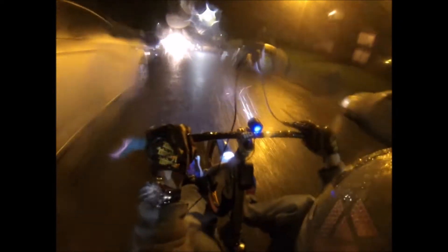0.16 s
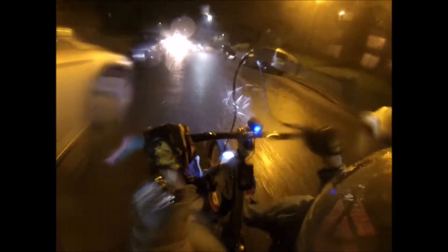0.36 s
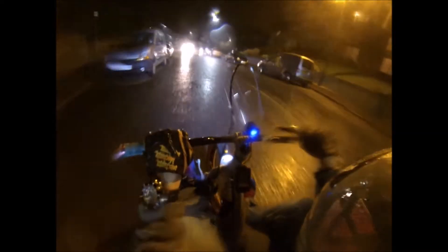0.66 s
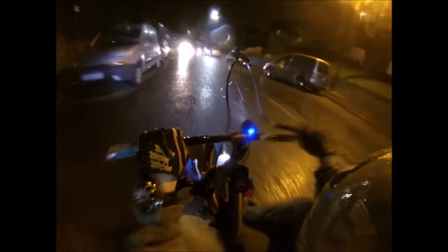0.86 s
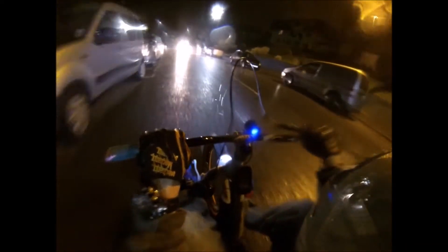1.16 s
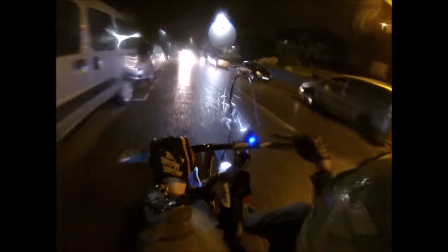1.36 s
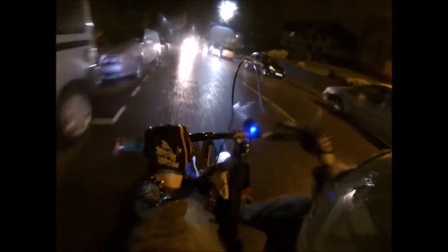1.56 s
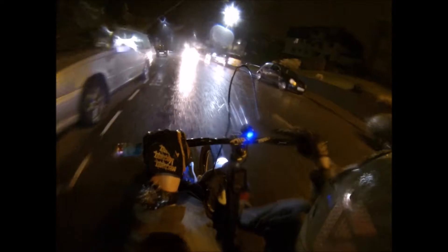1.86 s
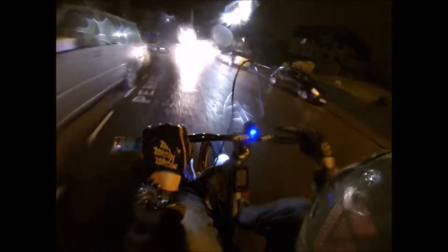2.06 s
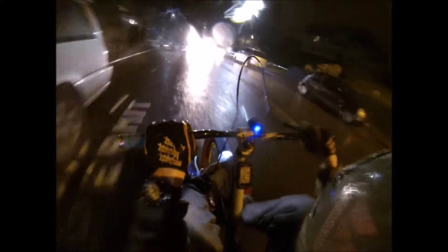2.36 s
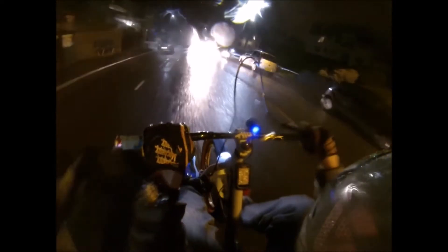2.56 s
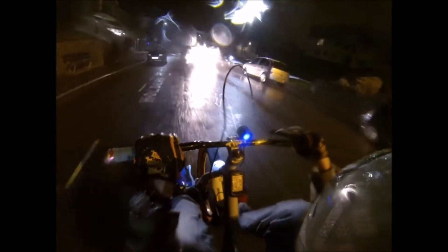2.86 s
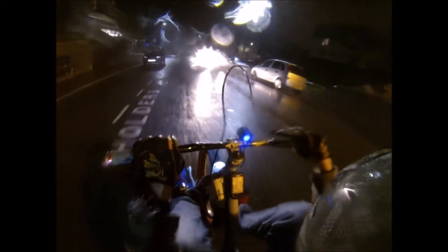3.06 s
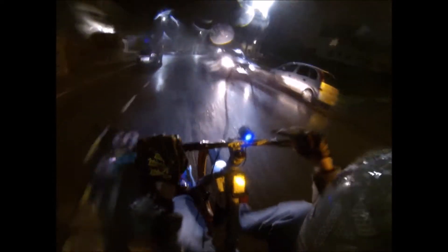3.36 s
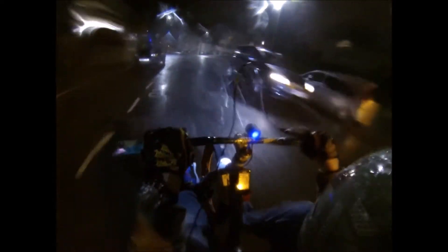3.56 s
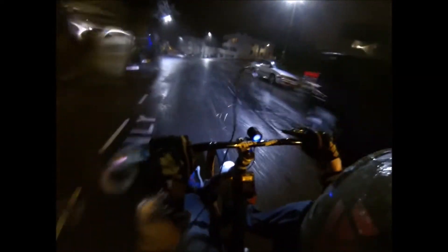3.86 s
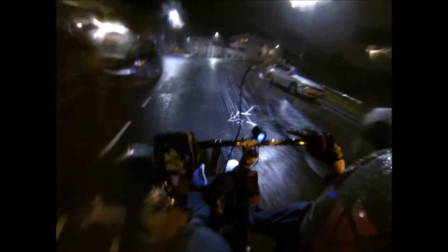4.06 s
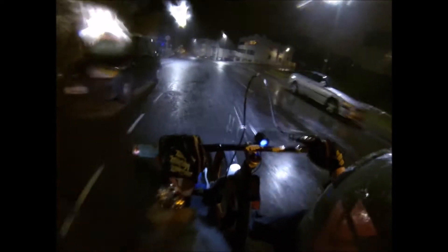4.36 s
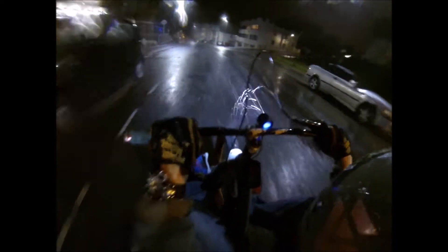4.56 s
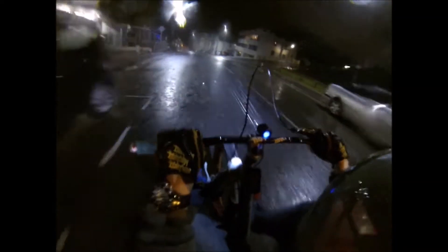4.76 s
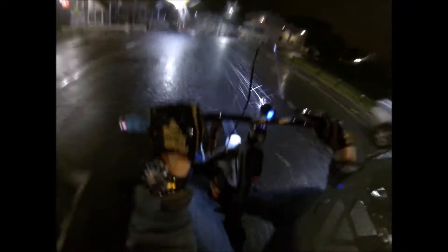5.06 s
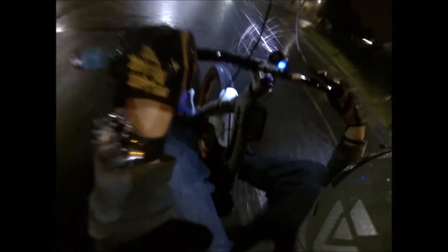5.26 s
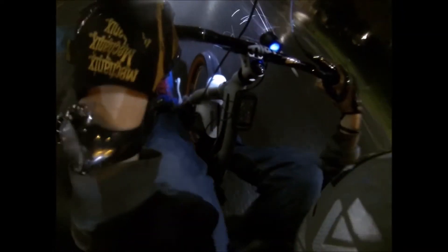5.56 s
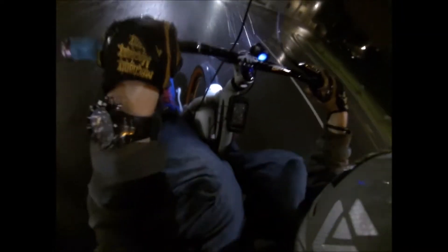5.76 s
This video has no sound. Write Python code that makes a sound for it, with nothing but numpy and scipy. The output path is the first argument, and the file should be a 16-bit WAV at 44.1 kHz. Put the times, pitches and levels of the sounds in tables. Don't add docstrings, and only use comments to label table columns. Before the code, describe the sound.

A tricycle speeds over wet, rough asphalt, heard inside a sealed camera case: low rumble, hard plastic knocks, rattles, and fine ticking spray.

```python
import sys
import numpy as np
from scipy import signal
from scipy.fft import rfft, irfft
from scipy.io import wavfile
from scipy.ndimage import uniform_filter1d

SR = 44100
rng = np.random.default_rng(int(sys.argv[2]) if len(sys.argv) > 2 else 0)


def inscribe(sig):
    pcm = np.round(np.clip(np.atleast_2d(sig).T, -1, 1) * 32767)
    wavfile.write(sys.argv[1], SR, pcm.astype(np.int16))


def gain_from_decibels(decibels):
    exponent = np.asarray(decibels, float) / 20
    return 10 ** exponent


N = 260190
T = np.arange(N) / SR

# f/Hz, level/dB per Hz
RUMBLE = [(3, -8.5), (10, 3.5), (18, -6), (27, 5), (38, -1), (50, -16), (90, -30), (140, -24.5), (300, -65)]
# t/s, lift/dB, length/s
WAVES = [
    (0, 10, 0.56),
    (1.15, 5.5, 0.32),
    (2.25, 6.5, 0.4),
    (2.85, 5.5, 0.27),
    (3.45, 4, 0.59),
    (4., 5, 0.14),
    (4.4, 11.5, 0.11),
    (4.75, 3.5, 0.39),
    (5.7, 3.5, 0.2),
]
# t/s, lift/dB
RIDGES = [(.2, 3), (.76, 3), (1.27, 4.5), (2.05, 3.5), (2.6, 6), (3., 15), (3.6, 3.5), (4., 9.5), (4.5, 10),
          (4.949, 5), (5.35, 6.5), (5.9, 8)]
# t/s, lift/dB
SEAMS = [
    (1.899, 4),
    (2.651, 3),
    (3.05, 2),
    (3.65, 4.5),
    (4.2, 8.5),
    (4.6, 4),
    (5.4, 8),
    (5.9, 2.5),
]


def shake():
    rumble = steadied(coloured(RUMBLE, 10, 52), share=0.51)
    fork = steadied(family(rng.standard_normal(N), [(67.0, 0, 0.18)], order=2), share=0.31)
    frame = steadied(family(rng.standard_normal(N), [(169.4, 0, 0.1)], order=2), share=0.13)
    waves = lifts(WAVES)
    ridges = lifts((s, db, 0.27) for s, db in RIDGES)
    seams = lifts((s, db, 0.26) for s, db in SEAMS)
    both = gain_from_decibels(-26.34 + waves) * rumble + gain_from_decibels(-33.5 + ridges) * fork
    both = both + gain_from_decibels(-38.5 + 0.82 * waves + seams) * frame
    return road(0, per_rough=0.03) * both


# f/Hz, level/dB, t60/s
HOLLOW = [(1320.5, -5.5, 0.065), (1503, 6.5, 0.037), (1595, 5, 0.034)]
# f/Hz, level/dB, t60/s
BRACKET = [(526.4, -5, 0.15), (714, 3.5, 0.067), (770, 4, 0.01)]


def hollow():
    buzz = rng.standard_normal(N) * wobble(hz=70, db=3.5)
    damped = [(hz, db, 0.14 * t60) for hz, db, t60 in HOLLOW]
    note = steadied(family(buzz, damped, order=2), share=0.44)
    hum = evened(family(rng.standard_normal(N), BRACKET))
    return road(-27, per_rough=0.96) * (note + gain_from_decibels(-23) * hum)


# t/s, shell level/dB, then clack and tip levels/dB over the shell
KNOCKS = [(0.0811, -3.5, -14.5, -22), (.118, -6.5, -2, -12), (0.1385, -5, -9.5, -15), (.16, -7.5, -26, -25),
          (0.2243, -8, -6, -14), (0.3857, -1, -8.5, -11.5), (0.4278, -2.5, -11, -16),
          (0.6678, -0.5, -17, -18), (1.149, -9, -7.5, -21), (1.3737, 2.5, -12, -16), (1.5229, 0, -9, -19.5),
          (1.69, -11.5, -37, -23), (1.9809, -10, -17, -22), (2.1963, -9.5, -5.5, -9), (2.413, -9, -20, -30),
          (2.6538, -1.5, -13, -27), (2.664, -5, -3, -18), (2.755, -3, -17, -11), (3.0847, -1.5, -9, -21),
          (3.1461, -8, -3, -8), (3.8065, -7.5, -12, -15.5), (4.0834, -4, -3.5, -13), (4.359, -4.5, -5, -19),
          (4.4006, -8.5, -22, -25), (4.4276, -9, 2.5, -12), (4.5535, -9.5, -2.5, -0.5),
          (5.109, -5.5, -7.5, -22), (5.2116, -0.5, -14, -18.5), (5.216, -2.5, -4, -13),
          (5.6926, -5.5, -3.5, -10)]
KNOCK_HZ = [2750, 2780, 2800, 2670, 2680, 2840, 2450, 2620, 2780, 2650, 2820, 2810, 2710, 2720, 2600, 2810,
            2855, 2850, 2746, 2950, 2670, 2820, 2490, 2810, 2580, 2880, 2650, 2740, 2790, 2670]
# t/s, shell level/dB, clack level/dB over the shell
RATTLES = [(0.143, -15, -7), (.257, -13, -4), (0.3347, -16, -3), (0.3423, -11, -5.5), (0.367, -7.5, -2.5),
           (0.435, -9, -13), (0.818, -13.5, -19), (2.072, -17, -2.5), (2.2286, -19, -4),
           (2.5012, -16.5, -8), (2.6228, -13, -0.5), (2.74, -14.5, 2.5), (2.866, -13, -3.5),
           (3.007, -12.5, -4.5), (3.69, -14.5, -14), (3.7587, -15, -2), (3.77, -11, -6),
           (3.839, -10, -11.5), (3.841, -19, -6), (3.874, -11, -10), (3.9327, -12, -10), (4.059, -15, -8),
           (4.2007, -13.5, -7), (4.261, -10.5, -4.5), (4.776, -16, -3), (4.779, -12.5, -15),
           (4.8023, -14, -20), (4.905, -13.5, -30), (5.1494, -16, -4.5), (5.288, -11, -11)]
# f/Hz, level/dB, t60/s
SHELL = [(2064, -13, .025), (2362, -4, .016), (2646, 7, .019), (2857, 3, .011), (3510, -12, .018)]
# f/Hz, level/dB, t60/s
CLACK = [(4310, 1.3, 0.018), (4480, 0.83, 0.014), (4916, 11.7, 0.0099), (5410, 8.3, 0.0082),
         (6110, 3.5, 0.011)]
# f/Hz, level/dB, t60/s
TIP = [(7990, 0, .00145), (11010, 1.6, .0019), (12600, -11.8, .0007)]


def knocks():
    out = np.zeros(N)
    core_hz = SHELL[2][0]
    blows = KNOCKS + [(s, db, clack_db, clack_db - 9.5) for s, db, clack_db in RATTLES]
    pitches = KNOCK_HZ + [1.03 * core_hz] * len(RATTLES)
    for (s, db, clack_db, tip_db), hz in zip(blows, pitches):
        shell = [(f * hz / core_hz, mode_db, t60) for f, mode_db, t60 in SHELL]
        add(out, s, gain_from_decibels(db + 1.5) * strike(shell, .0011, 1.5, blow=.6, detune=.008, snap_db=1))
        add(out, s, gain_from_decibels(db + clack_db + 2.5) * strike(CLACK, .001, 2.5, blow=.7))
        add(out, s, gain_from_decibels(db + tip_db + 2.5) * strike(TIP, .0009, 2, blow=.5, sign=-1))
        stir_air(out, s, db)
    return out


# t/s, hollow note level/dB
THUDS = [(0.7515, -9), (1.2803, -8.5), (1.372, -18), (1.522, -19), (1.5381, -9), (1.6536, -16),
         (1.6817, -7.5), (1.98, -4.5), (2.1827, -13), (2.4149, -3.5), (2.4495, -8), (2.605, -8),
         (3.0852, -6.5), (3.549, -8), (3.7378, -10), (3.77, -5), (4.0523, -8), (4.169, -4.5), (4.2, -9),
         (4.428, -12), (4.5532, -8), (4.6648, -11), (5.2098, -7), (5.2146, -9), (5.54, -10.5), (5.5875, -9),
         (5.612, -11), (5.621, -7), (5.6435, -10), (5.658, -9)]
# t/s, hollow note level/dB, bracket level/dB
JOLTS = [(0.1595, -7, -40), (0.366, -7.5, -35), (0.6659, -8.5, -40), (.9515, -10.5, -35),
         (1.029, -13.5, -48), (1.2897, -12, -30), (1.3, -6.5, -36), (1.7295, -2.5, -31), (2.6445, -10, -45),
         (2.665, -1, -34), (2.9621, -5, -31), (3.0289, -33, -25.5), (3.3348, -16, -45), (3.6549, -15, -36),
         (3.674, -8.5, -28.5), (3.758, -47, -34), (4.0226, -7, -39), (4.0694, -25, -43), (4.2592, -5, -45),
         (4.3603, -6.5, -35), (4.5302, -21, -39), (5.421, -11.5, -34.5)]


def jolts():
    out = np.zeros(N)
    stiff = [(hz, db, .55 * t60) for hz, db, t60 in HOLLOW]
    for s, db, bracket_db in JOLTS + [(s, db, db - 79) for s, db in THUDS]:
        add(out, s - .0004, gain_from_decibels(db - .5) * strike(stiff, .0005, 2.5, blow=1.5, detune=.02, snap_db=0))
        add(out, s - .0013, gain_from_decibels(bracket_db + 4.5) * strike(BRACKET, .00031, .24, detune=0))
    return out


# t/s, clack level/dB, tip level/dB over the clack
STONES = [(0.358, -19, -9), (.391, -7, -5), (.422, -19, -22), (0.469, -13, -7), (0.4847, -12.5, -21),
          (0.6275, -19, -5), (1.2868, -10, -11), (1.326, -20, -9), (1.968, -20.5, -7), (2.218, -18, -15),
          (2.243, -23.5, 5), (2.358, -18, -2), (2.55, -18, -8), (2.562, -22, -14), (2.73, -18.5, -15),
          (3.676, -18, -3), (4.0232, -16, -1.5), (4.2207, -21, -10), (4.416, -36, 5), (4.424, -20, -21),
          (4.53, -12.5, 0), (4.598, -21.5, 5.5), (4.7682, -20, -5), (4.788, -18.5, 1), (4.9215, -22, 6),
          (5.2296, -27, 4), (5.251, -15.5, -8), (5.6137, -13, -2.5), (5.6208, -19.5, -26),
          (5.6572, -10.5, -7), (0.897, -32, -2), (1.682, -31, -7), (2.149, -32, -2), (3.4866, -35, -2),
          (3.559, -37, -8), (5.643, -41, -10)]
# t/s, clack level/dB
MUD = [(.0097, -26), (.1736, -23), (.1811, -26), (.508, -27), (.6059, -20.5), (1.361, -22), (1.7314, -23),
       (1.9278, -24), (1.9334, -24), (2.2364, -31), (2.278, -24), (2.3177, -23), (2.3547, -33),
       (2.5915, -23.5), (2.962, -26), (3.0588, -28), (3.1752, -24), (3.2616, -38), (3.945, -21),
       (4.02, -22), (4.1343, -28), (4.193, -22), (4.7979, -27), (4.8112, -17), (5.14, -23)]
# t/s, clack level/dB
GRIT = [(.2938, -27), (.3078, -21), (.6425, -23), (.777, -20.5), (.9487, -28), (.9523, -19), (1.1712, -27),
        (1.4741, -24), (1.5724, -28), (1.6033, -19.5), (1.7657, -21), (1.772, -25), (1.916, -23.5),
        (2.3161, -29), (2.331, -23), (2.3455, -18), (2.7464, -26), (3.0237, -23), (3.159, -23),
        (3.3348, -25), (3.608, -19.5), (3.654, -22), (3.7357, -22), (4.1693, -24), (4.6649, -19.5),
        (4.9579, -23), (5.0802, -27.5), (5.092, -26), (5.5379, -23), (5.8324, -21.5)]
# t/s, clack level/dB
SAND = [(.1556, -25), (.2006, -23), (.4961, -36), (.698, -28), (.7276, -25.5), (.8236, -28), (1.1916, -31),
        (1.433, -26), (1.9128, -26), (2.0866, -23.5), (2.3227, -35), (2.372, -26), (2.4593, -26.5),
        (2.547, -22), (2.556, -25), (3.0964, -18), (3.2935, -26), (3.631, -21.5), (3.6644, -24),
        (4.0347, -32), (4.125, -27), (4.7199, -29), (4.7594, -24), (5.015, -33), (5.1805, -28),
        (1.447, -29), (1.466, -23), (1.583, -24.5), (2.848, -35), (2.966, -36)]
# t/s, clack level/dB
DROPS = [(.088, -37), (.205, -41), (1.0993, -33), (1.2581, -37), (1.2984, -30), (1.6115, -32),
         (1.7586, -31), (1.8686, -42), (2.2725, -27.5), (2.9336, -32), (2.9452, -38), (3.3212, -32),
         (3.5488, -35), (4.7082, -45), (4.7486, -33), (5.0201, -41), (.061, -52), (.321, -32), (.454, -33),
         (.572, -35), (.737, -30), (1.181, -32), (1.211, -45), (1.546, -40), (2.339, -32), (2.386, -52),
         (2.678, -35), (2.699, -36), (2.709, -39), (2.789, -41)]


def touches():
    out = np.zeros(N)
    hits = list(STONES)
    for rows, tip_db in ((MUD, -8), (GRIT, -5), (SAND, -2.5), (DROPS, 3.5)):
        hits += [(s, db, tip_db) for s, db in rows]
    for s, db, tip_db in hits:
        add(out, s, gain_from_decibels(db + 2.5) * strike(SHELL, .0006, 4.5, blow=.9))
        add(out, s, gain_from_decibels(db + 2.5) * strike(CLACK, .0008, 3, blow=.8))
        add(out, s, gain_from_decibels(db + tip_db + 2) * strike(TIP, .0006, 2, blow=.5, sign=-1))
    for s, db, _ in STONES:
        stir_air(out, s, db)
    return out


# t/s, clack level/dB, tip level/dB over the clack
CHIPS = [(0.326, -23, -9.0), (0.466, -24, -11), (0.506, -33, -3), (0.7493, -31, -20.0), (0.809, -31, -12),
         (0.897, -42, -9), (0.9738, -29, -14), (1.539, -26, -17.5), (1.7516, -33.0, -26), (1.873, -33, -4),
         (1.9495, -32, -11.0), (1.981, -27, -23), (2.1327, -33, -11), (2.1824, -30, -15.5),
         (2.1856, -29, -14), (2.205, -25, -10), (2.5098, -38, -21.0), (2.9447, -22, -4),
         (3.1305, -29, -27.5), (3.2799, -30, -10.0), (3.454, -30, -14), (3.521, -32, -11),
         (3.6377, -33, -14.5), (3.822, -26, -8.5), (4.036, -20, -9), (4.416, -17, -9.5), (4.7078, -26, -11),
         (4.7122, -31, -10), (4.822, -31, -25.5), (4.997, -31, -12), (5.173, -30, -10), (5.23, -21, -6),
         (5.243, -31, -6.0), (5.4506, -31.5, -15.0), (5.4687, -32, -14), (5.5879, -31, -28.5)]
# t/s, shell level/dB
BUMPS = [(0.141, -14), (0.1556, -23.0), (0.1811, -24), (0.2406, -21), (0.3124, -19), (0.496, -22),
         (0.512, -15), (0.534, -19), (0.644, -14.5), (0.7769, -14), (1.0231, -26), (1.1008, -31),
         (1.538, -12), (1.5844, -20), (1.6824, -24), (1.7715, -16.5), (1.8109, -16.5), (1.994, -17),
         (2.0874, -32), (2.15, -27), (2.244, -17), (2.408, -38), (2.7747, -18), (2.9559, -19), (3.177, -19),
         (3.486, -26), (3.549, -25), (3.5564, -24), (3.6554, -22), (4.136, -22), (4.919, -24), (5.08, -19),
         (5.097, -19), (5.1994, -20), (5.5402, -17.5), (5.6428, -27)]
# t/s, tip level/dB
SPECKS = [(0.2746, -46), (0.3465, -45.0), (0.4008, -37), (0.4213, -43), (0.4798, -45), (0.515, -48.0),
          (0.5666, -46), (0.7109, -39), (0.8176, -31.5), (0.8716, -46), (1.1989, -42), (1.3021, -50.0),
          (1.3666, -49), (1.4424, -51.0), (1.5914, -46), (1.7338, -46), (1.8445, -42), (2.0397, -56),
          (2.4377, -47.5), (2.5142, -51), (2.6027, -48.5), (2.7594, -37), (2.9491, -39), (3.0125, -51.5),
          (3.0613, -50.5), (3.0902, -44), (3.3539, -42), (3.4596, -52), (3.5017, -44), (3.5878, -51),
          (4.0271, -43), (4.0665, -52), (4.174, -47.0), (4.1842, -41), (4.2072, -44), (4.2309, -47),
          (4.2553, -49.0), (4.422, -42), (4.5485, -43), (4.7785, -40), (4.8004, -40), (4.8547, -50),
          (4.9007, -50.0), (4.9046, -53), (4.9759, -51), (5.0112, -47.5), (5.0539, -51), (5.1134, -47),
          (5.1576, -44.0), (5.2978, -36), (5.3433, -46), (5.6736, -50.0), (5.8261, -48)]
# t/s, tip level/dB
FLECKS = [(0.0509, -42), (0.2068, -31), (0.2629, -45), (0.2907, -28.5), (0.2977, -39), (0.3418, -25),
          (0.3749, -29), (0.4476, -42), (0.5304, -44), (0.6211, -45.5), (0.6528, -46), (0.6785, -49.0),
          (0.7564, -38), (0.8346, -46), (1.3332, -41), (1.6997, -50.5), (1.8071, -48), (1.8393, -47),
          (2.1911, -40), (2.3538, -36.5), (2.4511, -38), (2.4691, -48.0), (2.6605, -48), (3.0323, -41.5),
          (3.1058, -51.0), (3.1398, -64), (3.1845, -51.0), (3.2617, -44), (3.3476, -45.5), (3.3926, -53),
          (3.5079, -48.0), (3.5237, -39), (3.5804, -39), (3.5851, -46), (3.5974, -52), (3.6133, -43),
          (3.706, -41.0), (3.838, -29), (3.8683, -45.0), (4.0707, -51), (4.1934, -26), (4.2441, -37),
          (4.3244, -45), (4.3524, -37), (4.6621, -41), (4.6894, -48.5), (4.8711, -44.5), (4.8832, -49.5),
          (4.9154, -39.0), (4.9296, -41), (5.0199, -36), (5.1856, -43.0), (5.3737, -41), (5.5529, -47)]


def ticks():
    out = np.zeros(N)
    fine = [(s, db + 11, -11) for s, db in SPECKS] + [(s, db - 3, 3) for s, db in FLECKS]
    for s, db, tip_db in CHIPS + fine:
        add(out, s, gain_from_decibels(db + 4) * strike(CLACK, .0001, 1.6, blow=.48))
        add(out, s, gain_from_decibels(db + tip_db + 8.5) * strike(TIP, .00055, 3.6, blow=.51, sign=-1.8))
    for s, db in BUMPS:
        add(out, s, gain_from_decibels(db + 3.5) * strike(SHELL, .00013, 10, blow=2.3))
    return out


def patter():
    spray_gusts = wobble(hz=70, db=5.5)
    grit = grains(per_s=350, spread_db=4.5)
    out = 0
    for modes, spray_db, grit_db in ((SHELL, -4, -12), (CLACK, -13, -16), (TIP, -25, -29)):
        spray = grains(per_s=1500, spread_db=4.5)
        out = out + gain_from_decibels(spray_db) * spray_gusts * evened(struck(spray, modes))
        out = out + gain_from_decibels(grit_db) * evened(struck(grit, modes))
    port = evened(family(rng.standard_normal(N), [(5050, 0, .0055)], order=2)) * spray_gusts ** .3
    return road(-40.5, per_rough=0.065, per_wet=0.93) * (out + gain_from_decibels(-9.5) * port)


# f/Hz, level/dB per Hz
WASH = [(53, -46), (90, -9), (118, -12), (171, -7), (241, -14.5), (875, -21.5), (1370, 1), (2030, -16),
        (2700, -16.5), (6500, -45.5), (8450, -44), (14300, -120)]


def wash():
    gain = road(-42.5, per_rough=0.17, per_wet=0.25)
    return gain * coloured(WASH, 221, 910) * wobble(hz=26, db=2)


def whine():
    return gain_from_decibels(-73.5) * evened(ring(rng.standard_normal(N), 12900, .04))


# t/s, roughness level/dB, wetness level/dB
ROAD = [(0, -6, -4), (.25, 6.5, 1.5), (.45, 3.5, 3.5), (.85, -2.5, -10), (1.1, -2.5, -10), (1.5, 2, -5.5),
        (1.8, -2.5, -3), (2.4, 0, -3), (2.9, 6.5, 1), (3.1, 3, 0.5), (3.3, -7.5, -4.5), (3.7, -6, 0.5),
        (4.2, 1, 1.5), (4.6, -6, -5), (4.8, -3, 0.5), (5.24, -1, -4.5), (5.46, -4.5, -15.5), (5.9, -4, -6)]


def road(db, per_rough, per_wet=0):
    s, rough, wet = np.transpose(ROAD)
    return gain_from_decibels(db + np.interp(T, s, per_rough * rough + per_wet * wet))


def lifts(rows):
    return sum(db * np.exp(-(2 * (T - s) / length) ** 2) for s, db, length in rows)


def evened(x):
    return x / np.sqrt(np.mean(x ** 2) + 1e-20)


def steadied(x, share):
    swing = np.sqrt(uniform_filter1d(evened(x) ** 2, size=3500) + 0.043)
    return evened(x / swing ** share)


def coloured(points, lo_hz, hi_hz):
    hz = np.fft.rfftfreq(N, 1 / SR)
    f, db = np.transpose(points)
    z = rfft(rng.standard_normal(N)) * gain_from_decibels(np.interp(np.log(hz + 1), np.log(f + 1), db))
    inside = irfft(z * (hz > lo_hz) * (hz < hi_hz), N)
    return irfft(z, N) / np.std(inside)


def wobble(hz, db):
    pole = np.exp(-2 * np.pi * hz / SR)
    slow = signal.lfilter([1], np.poly([pole, pole]), rng.standard_normal(N))
    return gain_from_decibels(db * evened(slow))


def grains(per_s, spread_db):
    size = gain_from_decibels(spread_db * np.minimum(rng.exponential(1, N), 4))
    return size * rng.choice([-1, 1], N) * (rng.random(N) < per_s / SR)


def ring(x, hz, t60):
    r = 1000 ** (-1 / (t60 * SR))
    w = 2 * np.pi * hz / SR
    return signal.lfilter([np.sin(w)], [1, -2 * r * np.cos(w), r * r], x)


def family(x, modes, order=1, sign=-1):
    out = 0
    for k, (hz, db, t60) in enumerate(modes):
        y = x
        for _ in range(order):
            y = ring(y, hz, t60)
        out = out + sign ** k * gain_from_decibels(db) * y
    return out


def struck(x, modes, sign=-1, snap_db=13):
    edges = [.72 * modes[0][0], 1.12 * modes[-1][0]]
    both = family(x, modes, sign=sign) + gain_from_decibels(snap_db) * x
    return signal.sosfilt(signal.butter(3, edges, "bandpass", fs=SR, output="sos"), both)


def strike(modes, contact_s, spread_db, blow=3.0, sign=1, detune=.025, snap_db=13):
    t = np.arange(1800) / SR
    noise = rng.standard_normal(1800)
    chatter = noise * np.sqrt(t / contact_s) * np.exp(-t / contact_s)
    contact = chatter / np.linalg.norm(chatter) + blow * (t == 0)
    z = rfft(np.roll(contact, 6))
    drive = irfft(z / abs(z) ** .75) * np.exp(-t / (5 * contact_s))
    chance = rng.standard_normal(len(modes)) * spread_db
    shift = 1 + detune * rng.standard_normal(len(modes))
    here = [(hz * d, db + c, t60) for (hz, db, t60), c, d in zip(modes, chance, shift)]
    y = struck(drive, here, sign, snap_db)
    return y / abs(y).max()


def add(mix, s, sound):
    part = mix[round((s - .0005) * SR):][:len(sound)]
    part += sound[:len(part)]


def stir_air(mix, s, db):
    add(mix, s, gain_from_decibels(db - 19) * strike(HOLLOW, .00019, 1.8))


def scene():
    through_mount = shake() + hollow() + jolts()
    on_case = knocks() + touches() + ticks() + patter()
    return (through_mount + on_case + wash() + whine())[None]


def starve(x, moments, top_hz, pick, lift):
    short = sum((T > a) & (T < b) for a, b in moments)
    hz, _, z = signal.stft(x, SR, nperseg=1536)
    strong = abs(z) > pick * uniform_filter1d(abs(z), size=25, axis=1)
    upper = ((hz > 3000) & (hz < top_hz))[:, None]
    lower = (hz <= 3000)[:, None]
    thin = signal.istft(lift * z * strong * upper + z * lower, SR)[1][:, :N]
    return x + (thin - x) * uniform_filter1d(short * 1., size=90)


def trim(x):
    hz, _, z = signal.stft(x, SR, nperseg=1024)
    out = z.copy()
    for lo, hi, share in [(13300, 14000, .1), (14000, 14700, .22), (14700, 15300, .4),
                          (15300, 15870, .55), (15870, SR, .9)]:
        band = (hz >= lo) & (hz < hi)
        power = (abs(z[:, band]) ** 2).sum(axis=1, keepdims=True)
        out[:, band] *= power > np.quantile(power, share)
    return signal.istft(out, SR)[1][:, :N]


def roll_off(x):
    return signal.sosfilt(signal.butter(12, 16470, fs=SR, output="sos"), x)


# from t/s, to t/s
STARVED = [(.518, .527), (1.072, 1.082), (1.984, 2.016), (3.037, 3.042), (3.119, 3.129), (4.805, 4.817),
           (5.192, 5.204), (5.507, 5.524), (5.554, 5.569), (5.873, 5.888)]
# from t/s, to t/s
PINCHED = [(5.265, 5.288)]


def record(dry):
    dull = signal.sosfilt(signal.butter(2, 11000, fs=SR, output="sos"), dry)
    peak_db = 20 * np.log10(abs(dull[0]) + 1e-9)
    creep = T * 13.8
    over_db = np.maximum.accumulate(np.maximum(peak_db + 4.5, 0) * 0.97 + creep) - creep
    held = dull / gain_from_decibels(uniform_filter1d(over_db, size=61, origin=30))
    top = signal.sosfiltfilt(signal.butter(12, 16400, fs=SR, output="sos"), np.clip(held, -1, 1))
    short = starve(top, STARVED, top_hz=5300, pick=1.6, lift=2)
    short = starve(short, PINCHED, top_hz=7000, pick=1., lift=2.8)
    return roll_off(trim(short))


dry = scene()
out = record(dry)
inscribe(out)
```